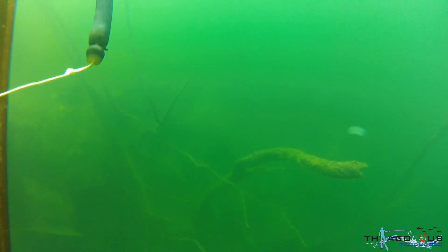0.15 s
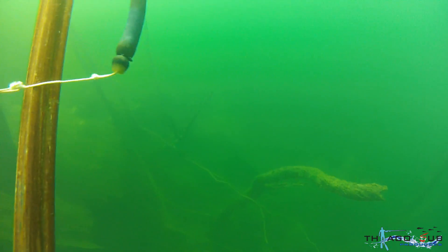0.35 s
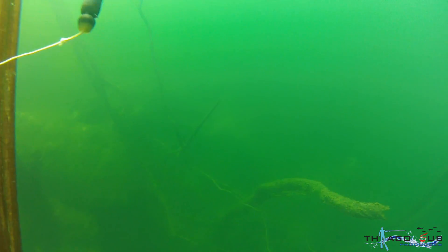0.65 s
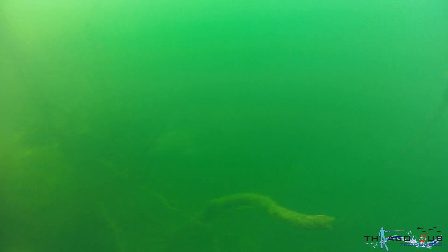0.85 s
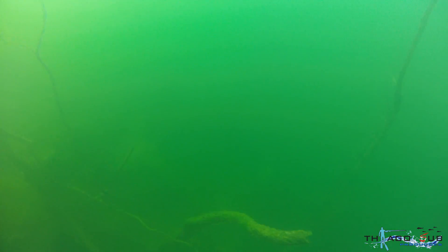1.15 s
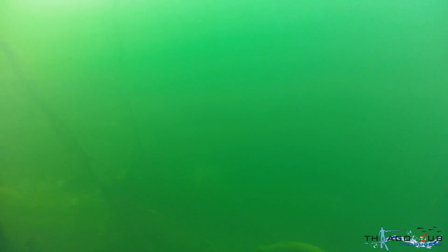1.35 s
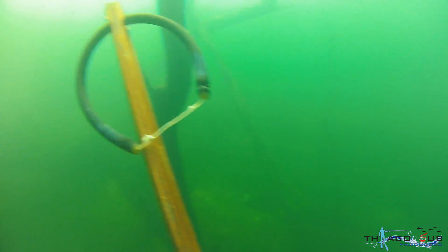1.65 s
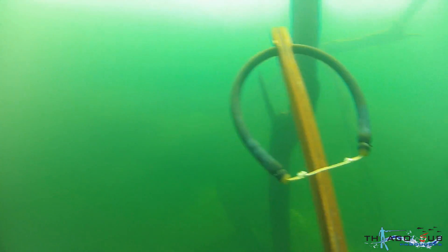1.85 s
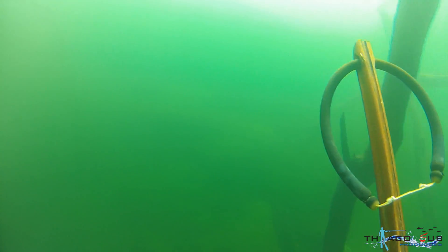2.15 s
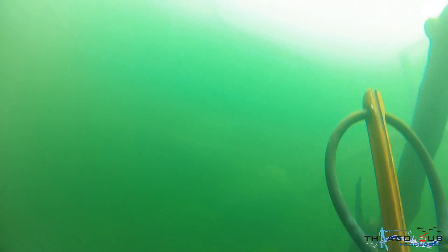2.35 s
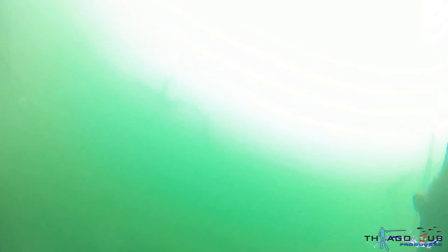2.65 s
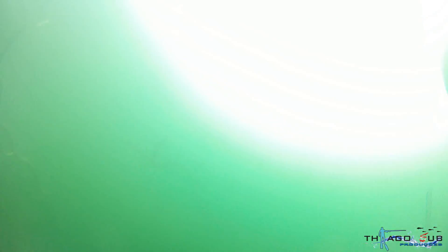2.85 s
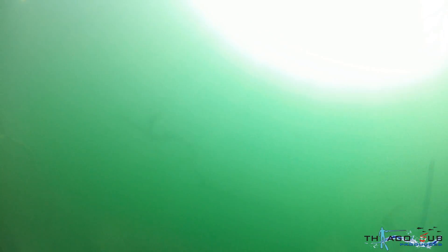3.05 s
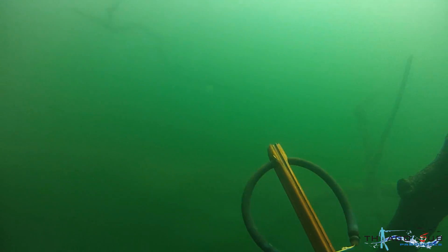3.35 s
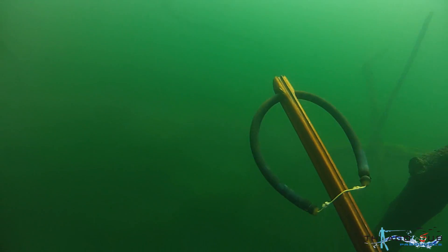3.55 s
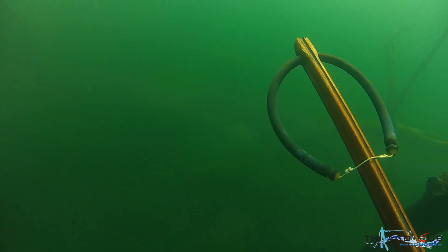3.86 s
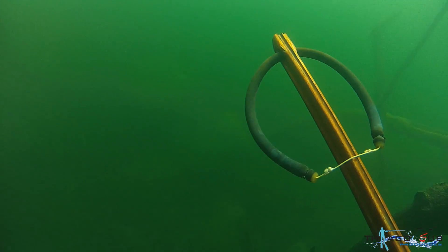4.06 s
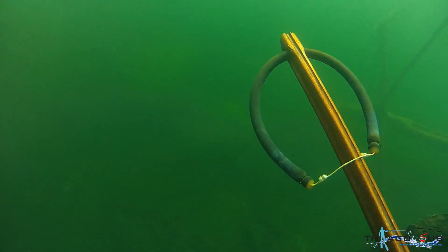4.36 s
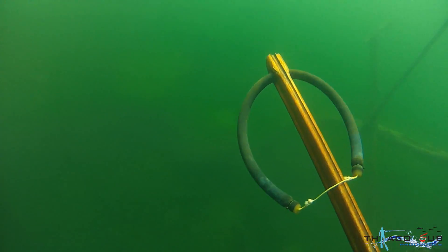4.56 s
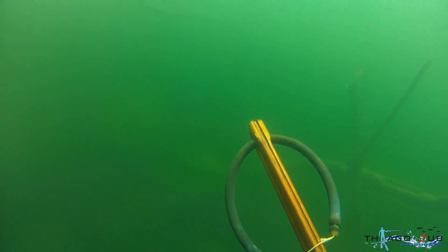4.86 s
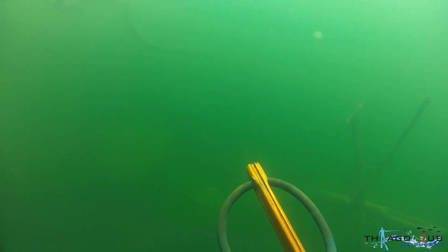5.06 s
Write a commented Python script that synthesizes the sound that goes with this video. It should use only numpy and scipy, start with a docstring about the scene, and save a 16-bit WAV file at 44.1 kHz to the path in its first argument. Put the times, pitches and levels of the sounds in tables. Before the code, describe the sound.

Low muffled underwater rumble with a brief gurgle, a cluster of sharp gear clicks, then dull knocks, rubbing and small bubble plops.

```python
"""A diver's camera in a sealed housing drifts under water, next to a speargun.
First a pocket of air gurgles. After a second, gear snaps against the housing and rings its modes.
From about three seconds on, water shoves the housing, the grip knocks dully on it, something rubs
along it and freed bubbles plop. Throughout, water rumbles underneath, and the camera's coarse
sampling gives every click a gritty mirror image in the treble."""
import sys
import numpy as np
from scipy import signal
from scipy.fft import rfft, irfft, next_fast_len
from scipy.io import wavfile
from scipy.ndimage import map_coordinates

SR = 44100
rng = np.random.default_rng(int(sys.argv[2]) if len(sys.argv) > 2 else 0)


def wrap_up_sound(samples):
    """Save the sound to the file named by the first command line argument, as 16-bit audio."""
    columns = np.atleast_2d(samples).T
    # keep every value between -1 and 1, then stretch to whole-number steps
    tamed = np.clip(columns, -1, 1)
    steps = np.round(tamed * 32767).astype(np.int16)
    wavfile.write(sys.argv[1], SR, steps)


N = 230038

# Modes of the housing. Each row: frequency in Hz, relative level in dB, time to fall 60 dB in seconds.
HOUSING_MODES = [(762, 0.5, 0.026), (893, -5.5, 0.033), (1176, -6, 0.015), (1365, 1.5, 0.025),
                 (1603, -0.5, 0.022), (2227, 2.5, 0.017), (2526, 0, 0.02), (2770, -3.5, 0.017),
                 (3335, -1, 0.015), (3626, -1, 0.02)]
# Snaps of gear. Each row: start in seconds, drive of the modes in dB in four bands (low, near 1.6 kHz,
# middle, high), then the struck part's own frequency in Hz and level in dB.
SNAPS = [(1.2198, -34.5, -45, -41.5, -30.5, 3670, -25.5), (1.3051, -33.5, -41, -37.5, -30.5, 3680, -28.5),
         (1.36, -29, -37, -34, -29, 3330, -30.5), (1.4243, -35.5, -32, -30, -27.5, 2750, -29),
         (1.6523, -56, -23.5, -26, -30.5, 2160, -22), (1.7309, -73, -62.5, -44, -36, 3760, -28),
         (1.771, -67, -52, -33.5, -38.5, 3120, -36)]


def snaps():
    """Impact excitation: a brief crack sets the struck part and the housing's modes vibrating freely."""
    out, t = np.zeros(N), np.arange(SR // 10) / SR
    for start, low, low_mid, mid, high, ring_hz, ring_db in SNAPS:
        body = np.zeros(len(t))
        for hz, db, t60 in HOUSING_MODES:
            drive_db = np.interp(hz, [1300, 1580, 2150, 2800, 3350], [low, low_mid, mid, mid, high])
            decay = amp(db + drive_db + rng.normal(0, 1.0) - 60 * t / t60)
            body += decay * sine(hz * rng.normal(1, 0.0086), t)
        ring = amp(ring_db) * swell(t, rise=0.0011, shape=0.88) * np.sin(2 * np.pi * ring_hz * t)
        crack = amp(high + 1 - 60 * t / 0.02) * rng.standard_normal(len(t))
        onset = 1 - np.exp(-t / 0.00031)
        add(out, start, (body + crack) * onset + ring)
    # The wall favours the middle frequencies and lets a little of the rest through.
    highpass = signal.butter(2, 550, "high", fs=SR, output="sos")
    lowpass = signal.butter(10, 4100, fs=SR, output="sos")
    return signal.sosfilt(np.vstack([highpass, lowpass]), out) + amp(-19.5) * out


# Knocks of the grip. Each row: start in seconds, level in dB, wall frequency in Hz, rise in seconds.
GRIP_KNOCKS = [(1.975, -45.5, 260, .0029), (3.502, -44, 340.3, 0.0025), (3.526, -45, 340, 0.0025),
               (3.78, -35, 343, .0018), (4.0965, -24, 320, .0014), (4.1895, -31.5, 434, 0.0019),
               (4.2803, -32, 370, .0023), (4.3203, -36, 375, 0.0023), (4.386, -33.5, 492, .0012),
               (4.449, -44.5, 366, 0.0025), (4.5402, -29.5, 392, 0.0027), (4.656, -40, 444, 0.0017),
               (4.928, -42, 460, 0.00087), (4.977, -44.5, 319, 0.0056), (5.1168, -27, 347, .0023),
               (5.138, -36.5, 350, 0.0036), (5.157, -39, 325.5, 0.0026), (5.2063, -30, 365, 0.003)]


def knocks():
    """Heavy damping: water stops the wall within a few cycles of each soft, slapping blow."""
    out, t = np.zeros(N), np.arange(SR // 8) / SR
    for start, db, hz, rise in GRIP_KNOCKS:
        wall = sine(hz, t)
        slap = amp(-12.5) * burst(len(t), centre_hz=1.48 * hz, octaves=0.62)
        add(out, start, amp(db) * swell(t, rise, shape=1.66) * (wall + slap))
    return out


# Sliding strokes and squeezes of the grip. Each row: start in seconds, length in seconds, level in dB.
SLIDE_STROKES = [(3.972, 0.034, -52), (4.03, 0.17, -57), (4.26, .13, -58), (4.485, 0.054, -63),
                 (4.56, 0.045, -56), (4.67, 0.042, -65), (4.82, .02, -64.5)]
GRIP_SQUEEZES = [(4.32, 0.11, -60), (4.54, .06, -59), (4.875, 0.18, -55), (5.135, 0.023, -53),
                 (5.195, .03, -46)]
# Spectra of the sliding and of the grip's creak. Each row: frequency in Hz, relative level in dB.
SLIDE_SPECTRUM = [(250, -18), (750, 2), (1130, -3.5), (1600, 4), (2300, -1), (3000, -8.5), (3500, -4.5),
                  (4200, -16), (5600, -17)]
CREAK_SPECTRUM = [(150, -17), (330, 24), (520, -14), (800, -2), (950, -1), (1200, -21), (3000, -36)]


def rubbing():
    """Friction: sliding contact hisses in fine grains, and the tightening grip creaks in coarser slips."""
    sliding = strokes(SLIDE_STROKES, attack_s=0.013, release_s=0.02)
    squeezing = strokes(GRIP_SQUEEZES, attack_s=0.014, release_s=0.023)
    grains = noise(SLIDE_SPECTRUM, grain_db=2, grain_rate=510)
    slips = noise(CREAK_SPECTRUM, grain_db=4, grain_rate=200)
    return sliding * grains + squeezing * slips


# Resonances of an air pocket. Each row: frequency in Hz, relative level in dB.
POCKET_MODES = [(200, -3), (350, -0.5), (425, -7.5)]
# Gulps of shifting air. Each row: start in seconds, level in dB.
AIR_GULPS = [(0.037, -36), (.067, -38.5), (.141, -44), (.156, -42.5), (.219, -49.5), (0.249, -50.5),
             (.284, -43), (.3, -49), (.355, -50), (.47, -50)]


def gurgle():
    """Cavity resonance: every gulp excites the modes of the same air pocket, a little detuned."""
    out, t = np.zeros(N), np.arange(SR // 8) / SR
    for start, db in AIR_GULPS:
        tone = sum(amp(level) * sine(hz * rng.normal(1, 0.027), t) for hz, level in POCKET_MODES)
        add(out, start, amp(db) * swell(t, rise=0.0069, shape=1.25) * tone)
    return out


# Freed bubbles. Each row: start in seconds, level in dB, initial frequency in Hz,
# time to fall 60 dB in seconds.
BUBBLES = [(1.837, -45.5, 1020, 0.021), (3.7811, -34.5, 737, 0.038), (4.186, -40.5, 2754, 0.033),
           (4.1912, -31.5, 770, 0.085), (4.241, -31.5, 907, 0.054), (4.2616, -38, 905, 0.035),
           (4.2615, -45.5, 2350, 0.032), (4.9445, -36.5, 754, 0.024), (4.9435, -45.5, 1740, 0.025),
           (4.9793, -33, 726, 0.024), (4.9807, -39, 2826, 0.033), (5.025, -45.5, 767, 0.085)]


def bubbles():
    """Bubble resonance: each freed bubble rings as a damped oscillator, its pitch creeping upward."""
    out, t = np.zeros(N), np.arange(SR // 8) / SR
    onset = 1 - np.exp(-t / 0.00064)
    for start, db, hz, t60 in BUBBLES:
        phase = 2 * np.pi * hz * (t + 0.067 * t * t / t60)
        add(out, start, amp(db - 60 * t / t60) * onset * np.sin(phase))
    return out


# Light ticks of gear, together with the sharp slap of the grip's knocks at 3.78, 4.097, 4.187, 4.542 and 5.198
# s. Each row: start in seconds, level in dB, centre frequency in Hz.
GEAR_TICKS = [(1.1216, -56, 2020), (1.3965, -48, 5300), (1.416, -43.5, 3800), (1.4765, -54, 4850),
              (1.583, -52.5, 2300), (1.7712, -43, 5200), (2.032, -47, 1800), (2.0312, -52, 4500),
              (2.817, -56.5, 4220), (2.9555, -49.5, 1880), (3.001, -58, 2420), (3.1054, -59, 4220),
              (3.2555, -53.5, 2080), (3.373, -58, 2180), (3.590, -50, 4120), (3.594, -45.5, 4340),
              (3.780, -43, 1550), (3.857, -54.5, 1670), (4.097, -49, 1000), (4.187, -48, 750),
              (4.542, -40, 680), (4.9797, -48.5, 2800), (5.198, -46.5, 960)]
# Short scrapes of gear. Each row: start in seconds, level in dB, rise in seconds.
GEAR_SCRAPES = [(.255, -64, 0.01), (.345, -62, 0.0058), (0.537, -51.5, .0038), (0.555, -55, .008),
                (1.137, -59, 0.0071), (1.261, -62, .014), (1.945, -65, .01), (2.065, -61, 0.0077)]


def light_contacts():
    """Contact noise: brief ticks cover a wide band; the longer scrapes share a narrower one."""
    out, t = np.zeros(N), np.arange(SR // 8) / SR
    for start, db, centre_hz in GEAR_TICKS:
        tick = burst(len(t), centre_hz, octaves=0.7)
        add(out, start, amp(db) * swell(t, rise=0.0011, shape=0.82) * tick)
    for start, db, rise in GEAR_SCRAPES:
        scrape = burst(len(t), centre_hz=1820, octaves=0.42)
        add(out, start, amp(db) * swell(t, rise, shape=0.97) * scrape)
    return out


# Slow pushes of water. Each row: start in seconds, level in dB, frequency in Hz.
WATER_PUSHES = [(3.1884, -41, 44.5), (3.28, -38, 47.6), (3.888, -36, 107)]


def pushes():
    """Damped oscillation: a shove of water rocks the housing for a cycle or two."""
    out, t = np.zeros(N), np.arange(SR // 8) / SR
    rise_cycles = 0.61
    for start, db, hz in WATER_PUSHES:
        add(out, start, amp(db) * swell(t, rise_cycles / hz, shape=1.92) * sine(hz, t))
    return out


# Surges of water as the camera moves. Each row: time of the peak in seconds, half length in seconds,
# sway level in dB, wash level in dB.
WATER_SURGES = [(0.225, 0.096, -56.5, -58), (0.573, 0.061, -62, -63.5), (1.638, 0.18, -55.5, -53.5),
                (1.977, .08, -56, -65), (2.651, 0.19, -58.5, -65.5), (2.95, 0.041, -54, -59.5),
                (3.257, 0.1, -51, -55.5), (3.999, 0.036, -39, -51), (4.117, .04, -49, -50),
                (4.305, 0.089, -51.5, -50.5), (4.56, 0.11, -56, -53.5), (5.11, 0.24, -61.5, -54.5)]
CALM_SWAY_DB, CALM_WASH_DB = -59, -60


def stirring():
    """Incoherent addition: the gains of sway and wash grow as each surge adds power to calm water."""
    t = np.arange(N) / SR
    power = amp([[CALM_SWAY_DB], [CALM_WASH_DB]]) ** 2
    for peak_s, half_length, sway_db, wash_db in WATER_SURGES:
        bell = np.exp(-((t - peak_s) / half_length) ** 2)
        power = power + amp([[sway_db], [wash_db]]) ** 2 * bell
    return np.sqrt(power)


# Water churning past the housing. Each row: start in seconds, length in seconds, level in dB.
WATER_CHURNS = [(.54, 0.045, -58.5), (.68, 0.1, -65), (1.41, .16, -56), (1.61, 0.11, -53.5),
                (2.64, 0.083, -60.5)]
# Spectra of the sway, wash and churning. Each row: frequency in Hz, relative level in dB.
SWAY_SPECTRUM = [(8, -18.5), (25, -7), (52, -7.5), (90, -14.5), (160, -22), (400, -50)]
WASH_SPECTRUM = [(40, -7.5), (110, -4.5), (200, -7), (340, -11.5), (480, -17), (650, -21.5), (1000, -29),
                 (2500, -38), (5000, -49.5)]
CHURN_SPECTRUM = [(50, -8), (125, 1), (200, -1.5), (290, -4.5), (370, -3.5), (470, 5), (560, -36),
                  (1000, -33.5)]


def water():
    """Flow noise: pressure sways slowly while water washes and churns round the housing."""
    sway_gain, wash_gain = stirring()
    churn_gain = strokes(WATER_CHURNS, attack_s=0.051, release_s=0.043)
    sway = sway_gain * noise(SWAY_SPECTRUM)
    wash = wash_gain * noise(WASH_SPECTRUM, grain_db=3, grain_rate=60)
    churn = churn_gain * noise(CHURN_SPECTRUM, grain_db=2, grain_rate=90)
    return sway + wash + churn


def crackle():
    """A Poisson process: tiny bubbles pop at random, more often in stirred water, and ring briefly."""
    out, t = np.zeros(N), np.arange(SR // 100) / SR
    _, wash_gain = stirring()
    above_calm_db = 20 * np.log10(wash_gain) - CALM_WASH_DB
    pops_per_s = 6 + 5 * above_calm_db
    starts = np.flatnonzero(rng.random(N) < pops_per_s / SR) / SR
    for start in starts:
        db = rng.normal(-58.5, 2.2)
        cycles = 2300 * np.exp(rng.normal(0, 0.25)) * t  # pitches scatter around 2300 Hz
        add(out, start, amp(db) * np.exp(-cycles / 2.3) * np.sin(2 * np.pi * cycles))
    return out


# Spectrum of the microphone's hiss. Each row: frequency in Hz, relative level in dB.
HISS_SPECTRUM = [(100, -12), (700, -9), (1500, -10.5), (3000, -12), (5000, -14.5), (6000, -18.5)]


def hiss():
    """Self-noise: the microphone adds a faint, steady floor."""
    return amp(-69) * noise(HISS_SPECTRUM)


def amp(db):
    """The decibel law: amplitude grows tenfold every 20 dB."""
    return 10 ** (np.asarray(db) / 20)


def unit(x):
    """Normalisation to rms 1."""
    return x / np.sqrt(np.mean(x ** 2) + 1e-20)


def sine(hz, t):
    """Simple harmonic motion with a random phase."""
    return np.sin(2 * np.pi * (hz * t + rng.random()))


def filtered(x, response):
    """Linear filtering: the spectrum of x is multiplied by a frequency response."""
    size = next_fast_len(x.shape[-1] + 8192)
    gain = response(np.fft.rfftfreq(size, 1 / SR))
    return irfft(rfft(x, size) * gain, size)[..., :x.shape[-1]]


def noise(spectrum, grain_db=0., grain_rate=100):
    """Source and filter: a force whose level varies grain_rate times a second is coloured, at rms 1."""
    knot_hz, db = np.transpose(spectrum)
    white = rng.standard_normal(N)
    grains = rng.standard_normal(int(N * grain_rate / SR) + 4)
    wobble = map_coordinates(grains, [np.arange(N) * grain_rate / SR])
    force = white * amp(grain_db * wobble)
    return unit(filtered(force, lambda hz: amp(np.interp(np.log(hz + 1), np.log(knot_hz), db))))


def burst(size, centre_hz, octaves):
    """Band-limited noise of rms 1, bell-shaped in log frequency."""
    band = lambda hz: np.exp(-(np.log2((hz + 1) / centre_hz) / octaves) ** 2)
    return unit(filtered(rng.standard_normal(size), band))


def swell(t, rise, shape):
    """The envelope of a soft contact: it reaches 1 after rise seconds, then decays."""
    u = t / max(rise, 1 / SR)
    return (u * np.exp(1 - u)) ** shape


def strokes(rows, attack_s, release_s):
    """Exponential growth and decay: each gesture fades in up to its start, holds and dies away."""
    t, gain = np.arange(N) / SR, np.zeros(N)
    for start, length, db in rows:
        attack = np.minimum(t - start, 0) / attack_s
        release = np.maximum(t - start - length, 0) / release_s
        gain = np.maximum(gain, amp(db) * np.exp(attack - release))
    return gain


def add(track, start, sound):
    """Superposition: a sound joins the track at a start in seconds."""
    part = track[max(round(start * SR), 0):][:len(sound)]
    part += sound[:len(part)]


def scene():
    """Superposition: all sources sum at one microphone; only a faint noise sets the channels apart."""
    sound = (water() + gurgle() + rubbing() + snaps() + knocks() + pushes()
             + bubbles() + light_contacts() + crackle() + hiss())
    spread = amp(-75) * noise([(40, -8), (300, -4.5), (700, -15), (5000, -13.5)])
    return np.array([sound + spread, sound - spread])


def record(dry):
    """Zero-order hold: the camera keeps each coarse sample as a step, mirroring sound into the treble."""
    camera_hz, anti_alias_hz, top_hz = 12000, 5720, 15300
    narrow = filtered(dry, lambda hz: 1 / np.sqrt(1 + (hz / anti_alias_hz) ** 60))
    coarse = signal.resample_poly(narrow, camera_hz, SR, axis=1)
    held = np.repeat(coarse, 8, axis=1)
    steps = signal.resample_poly(held, SR, 8 * camera_hz, axis=1)[:, :N]
    return filtered(steps, lambda hz: 1 / np.sqrt(1 + (hz / top_hz) ** 160))


dry = scene()
out = record(dry)
wrap_up_sound(out)
```